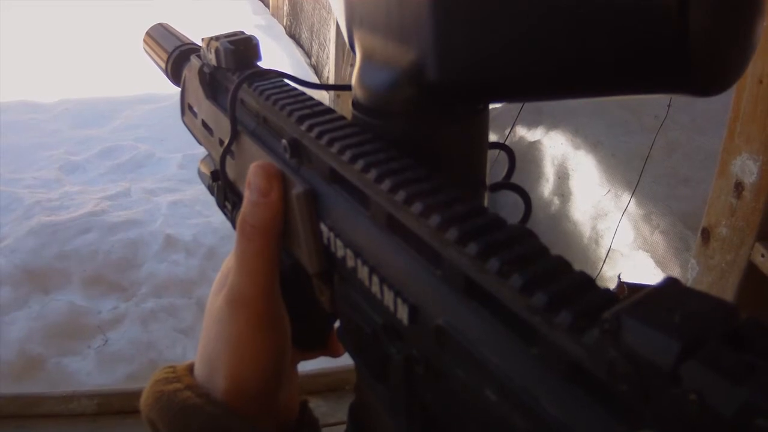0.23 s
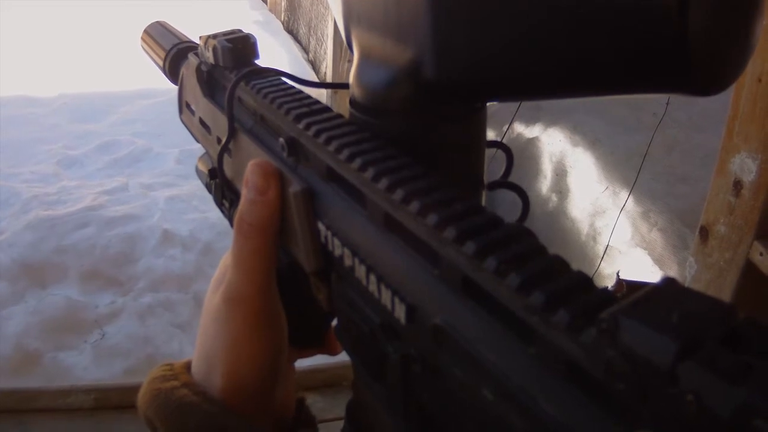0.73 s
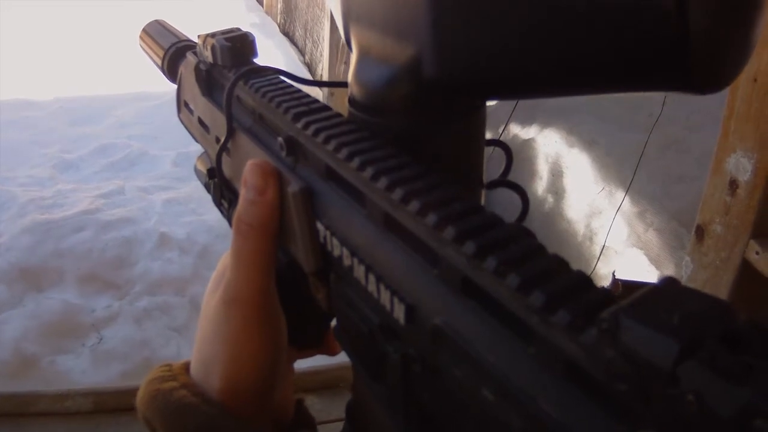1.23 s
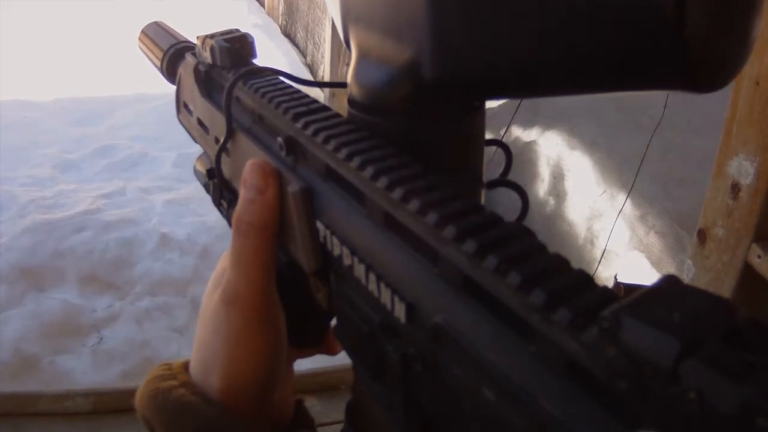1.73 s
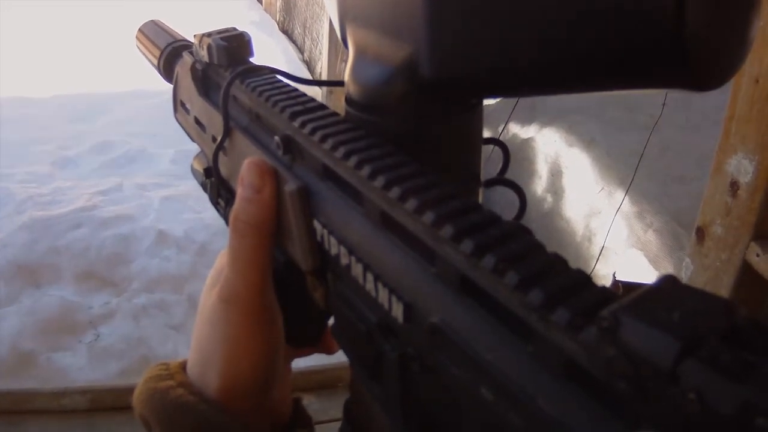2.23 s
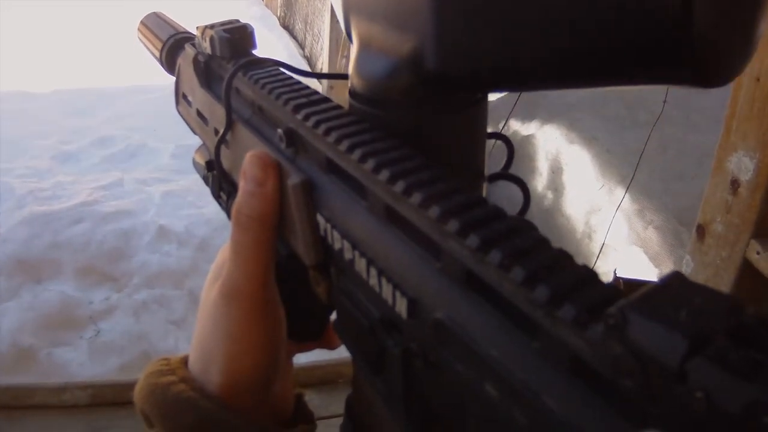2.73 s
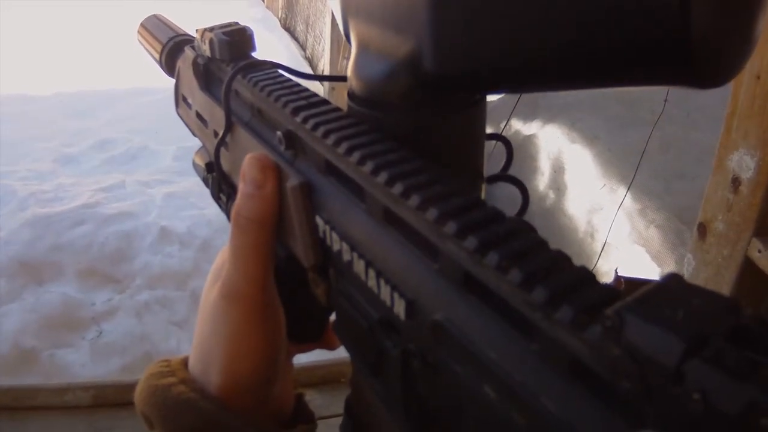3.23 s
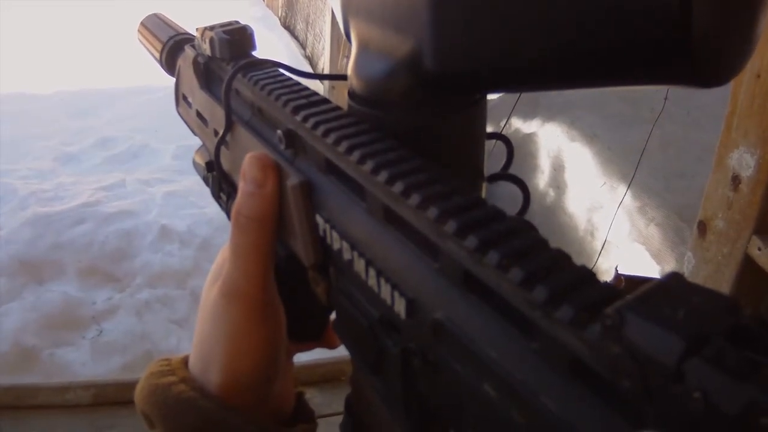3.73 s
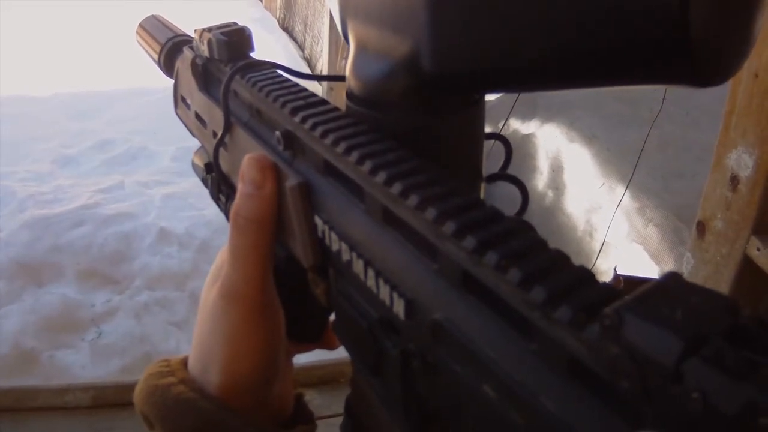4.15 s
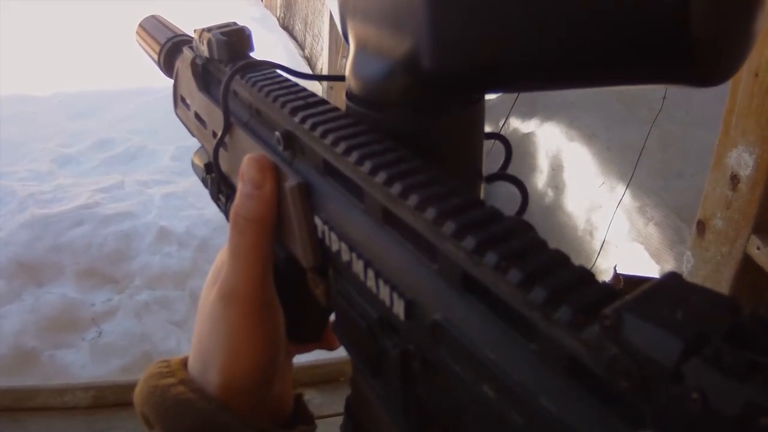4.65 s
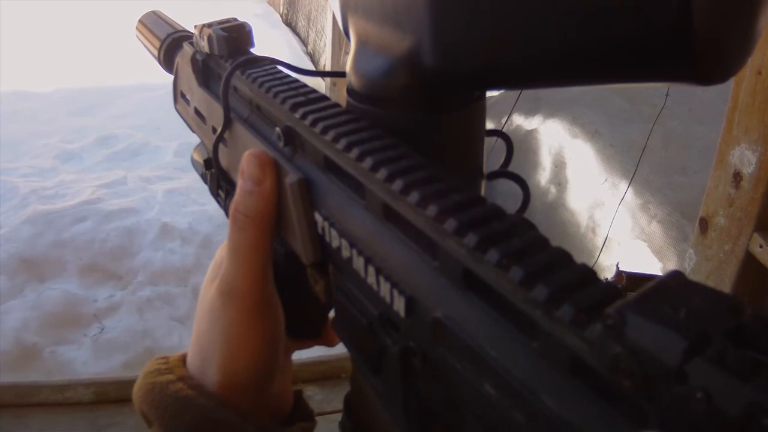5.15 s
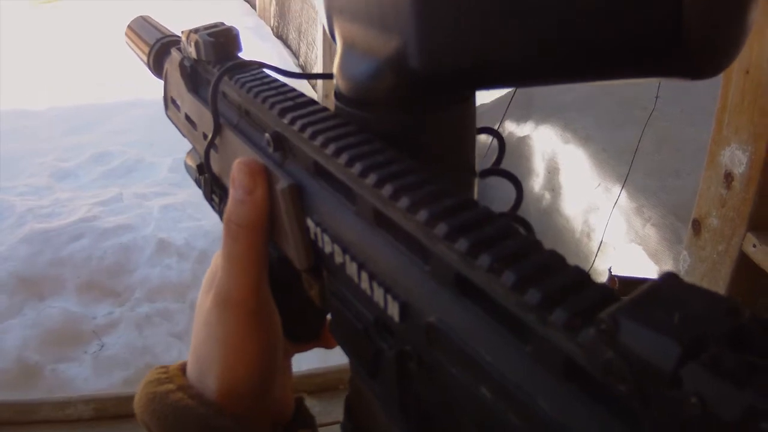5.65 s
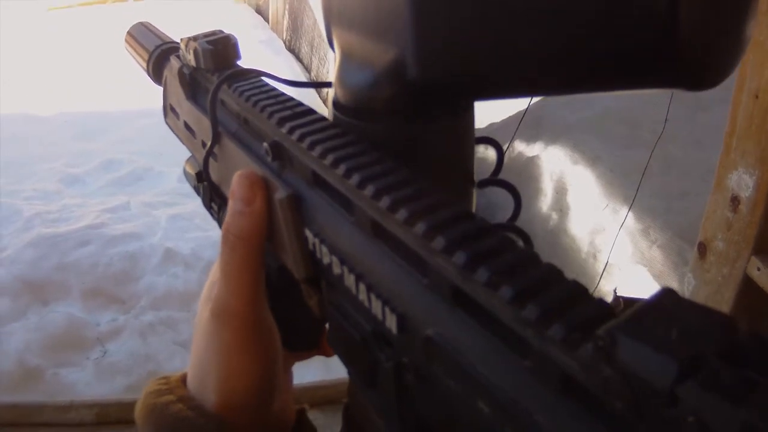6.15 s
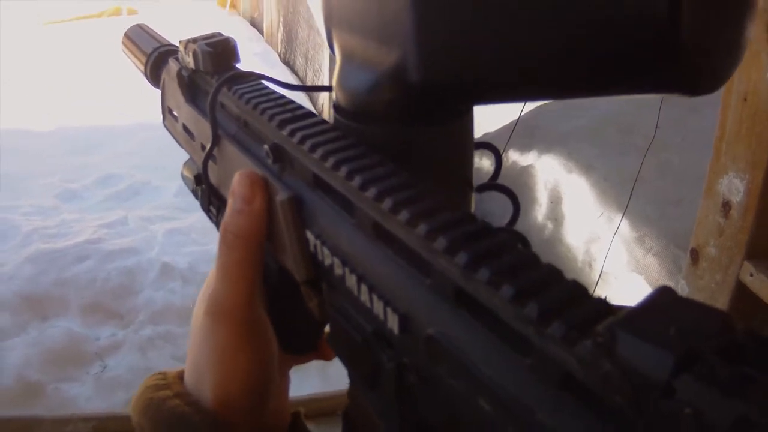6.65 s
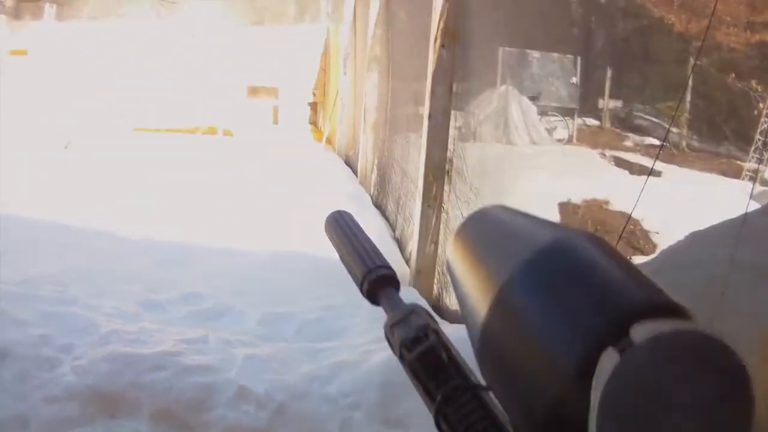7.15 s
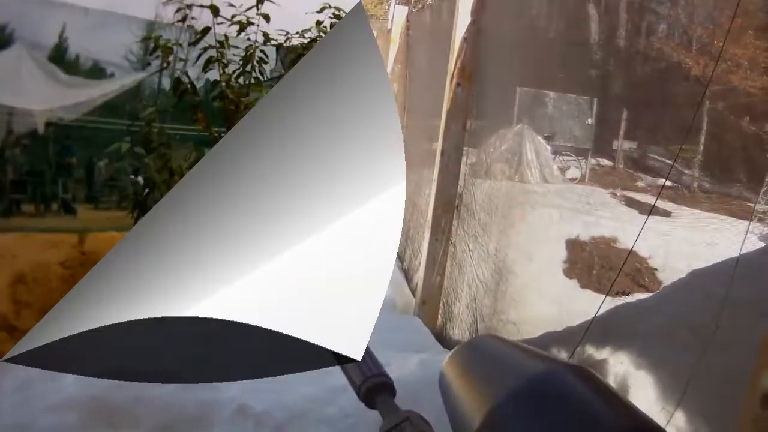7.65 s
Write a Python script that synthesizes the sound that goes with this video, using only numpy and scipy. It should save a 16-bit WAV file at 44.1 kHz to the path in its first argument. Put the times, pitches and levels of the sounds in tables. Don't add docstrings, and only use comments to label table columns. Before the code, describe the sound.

A gas-driven paintball marker fires rapid bursts very close to a boxed-in microphone in a snowy yard beside a wooden wall. Hard, slightly overloaded pops mix with bolt clatter and quick wall echoes. Balls rattle in the hopper and paint splats between bursts. After the last burst the trigger clicks twice, a quiet lull follows, then an abrupt cut brings windy field noise and distant shots.

```python
import sys
import numpy as np
from scipy import signal
from scipy.fft import rfft, irfft
from scipy.io import wavfile
from scipy.ndimage import uniform_filter1d, minimum_filter1d

SR = 44100
rng = np.random.default_rng(int(sys.argv[2]) if len(sys.argv) > 2 else 0)


def convert_level_to_amplitude(level_db):
    exponent = np.asarray(level_db, float) / 20
    return 10 ** exponent


def log_audio(samples):
    frames = np.atleast_2d(samples).T
    limited = np.clip(frames, -1, 1)
    pcm = np.round(limited * 32767).astype(np.int16)
    wavfile.write(sys.argv[1], SR, pcm)


N = 348384
LEAD = SR // 4
CUT_S = 7.36
BOX_HUM_HZ = 507

# first shot t/s, last shot t/s
BURSTS = [
    (-.19, -.049),
    (.957, 1.3795),
    (2.5366, 2.7476),
    (3.1626, 3.3377),
    (4.3713, 4.5119),
    (4.7064, 4.8471),
    (5.0003, 5.141),
]
# blast level/dB, far echo level/dB
STRENGTH = [(0, 4), (0.43, 0), (0.5, 3), (0.16, -2), (0, -2.5), (0.1, 2.5), (0.16, -13.5)]
# f/Hz, level/dB
TICK_COLOUR = [(530, -46), (900, -8), (2440, 2.5), (2830, -6.5), (3830, 1), (4600, -12), (5980, -57),
               (10100, -120)]
# f/Hz, level/dB
SPLASH_COLOUR = [(4000, -33.5), (5000, -10.5), (6500, 0), (8000, -11), (11500, -6), (13000, -20.5)]


def evened(x):
    return x / np.sqrt(np.mean(x ** 2) + 1e-20)


def read(points, hz):
    f, value = np.transpose(points)
    return np.interp(np.log(hz + 1), np.log(f + 1), value)


def add(mix, s, sound):
    part = mix[LEAD + round(s * SR):][:len(sound)]
    part += sound[:len(part)]


def noise(points, size):
    gain = convert_level_to_amplitude(read(points, np.fft.rfftfreq(size, 1 / SR)))
    return evened(irfft(rfft(rng.standard_normal(size)) * gain, size))


def resonate(x, hz, width_hz):
    return signal.lfilter(*signal.iirpeak(hz, hz / width_hz, SR), x)


def ring(modes, t):
    waves = sum(gain * convert_level_to_amplitude(-60 * abs(t) / t60) * np.sin(2 * np.pi * hz * t) for hz, gain, t60 in modes)
    return waves * (t > 0)


def echoed(x, paths):
    taps = np.zeros(1000)
    for ms, gain in paths:
        taps[round(ms * SR / 1000)] = gain
    return np.convolve(x, taps)[:len(x)]


def marker():
    out, body = np.zeros(N + LEAD), blast()
    for s, db, leak_db in shots():
        add(out, s - .001, convert_level_to_amplitude(db) * body)
        add(out, s - .001, convert_level_to_amplitude(db / 2) * crack())
        add(out, s - .012, action(-.4 * db))
        add(out, s - .012, convert_level_to_amplitude(db) * pings())
        add(out, s, recoil(-32, 79))
        leaked = np.sqrt(abs(1 - convert_level_to_amplitude(leak_db) ** 2))
        add(out, s - .002, leaked * leak())
    return out


def shots():
    # t/s, level under the burst/dB
    uneven = [(.992, -6), (1.027, -6), (1.062, -5.5), (1.097, -3.5), (1.134, -5.5), (1.274, -4),
              (2.572, -6.5), (2.606, -4), (2.678, -7), (3.268, -8), (4.407, -2.5), (4.442, -7), (4.512, -4)]
    cycle_s, jitter_s = .0352, .0002
    rows = []
    for (first, last), (db, _) in zip(BURSTS, STRENGTH):
        for s in np.linspace(first, last, round((last - first) / cycle_s) + 1):
            leak_db = sum(less for at, less in uneven if abs(at - s) < cycle_s / 2)
            rows.append((s + jitter_s * rng.standard_normal(), db + leak_db, leak_db))
    return rows


def puff(t, long_s):
    u = np.maximum(t, 0) / long_s
    return (1 - u) * np.exp(-u) * np.clip(t * 15000, 0, 1)


def blast():
    # delay t/ms, signed gain
    blast_paths = [
        (0, 1),
        (1.31, -.9),
        (1.95, .45),
        (5.15, .64),
        (6.02, -.48),
        (13.95, .27),
    ]
    # delay t/ms, gain
    box_paths = [(0, 1), (4.88, 1.05), (13.7, .24), (18.5, .13)]
    # delay t/ms, gain
    port_paths = [(0, 1), (5.12, .6), (8.15, .25), (13.85, .35), (18.75, .22)]
    # f/Hz, signed gain, t60/s
    box_modes = [(606, .72, .0197), (215, .17, .018), (108, .045, .07), (518, -1.2, .0109)]
    t = np.arange(3000) / SR - .001
    gas = 1.8 * (puff(t - .00037, .00012) + puff(t - .00055, .00024))
    body = echoed(gas, blast_paths)
    body += echoed(ring(box_modes, t + .00075), box_paths)
    body += echoed(ring([(1950, .3, .005)], t), port_paths)
    body += ring([(222, .12, .022)], t - .0084)
    return signal.lfilter(*signal.butter(2, 85, "high", fs=SR), body)


def crack():
    t = np.arange(400) / SR - .001
    sharp, soft = rng.uniform(.8, 1.15, 2)
    uncorking = ring([(4300 * sharp, 1.9, .0013)], t - .00004)
    return uncorking - ring([(2900 * soft, .36, .004)], t + .00065)


def action(vent_db):
    # t/ms, level/dB, t60/s
    parts = [
        (-10.5, -28, .025),
        (-6.5, -24, .035),
        (-1.2, -19, .01),
        (.2, -24, .012),
        (1.5, -15.5, .036),
        (4.2, -18, .015),
        (12, -20, .045),
        (24.5, -27, .025),
    ]
    # f/Hz, level/dB
    metal = [(410, -44), (700, -21), (772, -7), (850, -7), (1380, -1), (1720, -2), (4080, 1.5), (4840, -17),
             (6640, -6.5), (7970, -12.5), (10300, -16.5), (11800, -17), (12800, -53), (16600, -80),
             (22000, -120)]
    # f/Hz, width/Hz, level/dB
    frame_modes = [(1400, 120, -4), (2450, 170, 1.5), (3200, 240, -7.5), (3730, 200, -19), (4360, 50, 10),
                   (6200, 370, -8.5), (10500, 1800, -12)]
    t = np.arange(4096) / SR - .012
    loose = rng.standard_normal((len(parts), 2))
    power = 0
    for (ms, db, t60), (late, loud) in zip(parts, loose):
        since = np.maximum(t - (ms + .4 * late) / 1000, 0)
        rise = np.minimum(since / (.001 + .002 * (ms < -5)), 1)
        vented = vent_db * (1.8 * (0 < ms < 1) + .6 * (1 < ms < 3) - .4 * (ms > 10))
        level_db = db + 1.2 * loud + vented - 60 * since / t60
        power += convert_level_to_amplitude(2 * level_db) * rise ** 2
    unevenness = evened(uniform_filter1d(rng.standard_normal(len(t)), size=50))
    grit = noise(metal, len(t)) * convert_level_to_amplitude(2.6 * unevenness)
    frame = 0
    for (hz, width, db), more in zip(frame_modes, rng.normal(0, 3.5, len(frame_modes))):
        frame = frame + convert_level_to_amplitude(db + more) * resonate(grit, hz, width)
    return convert_level_to_amplitude(5.5) * np.sqrt(power) * evened(grit + .61 * frame)


def pings():
    # t/ms, f/Hz, level/dB, t60/s
    steel = [
        (-9.5, 6600, -20.5, .008),
        (-9, 9000, -25.5, 0.0049),
        (-6, 9600, -23.5, 0.0042),
        (-0.45, 21000, -10, 0.012),
        (3.7, 6000, -11.5, 0.0051),
        (4.5, 10300, -14, .007),
    ]
    t = np.arange(1200) / SR - .012
    loose = rng.standard_normal((len(steel), 3))
    push = np.sin(2 * np.pi * 600 * (t + .0044)) * np.clip((t + .008) / .003, 0, 1) * (t < 0)
    out = convert_level_to_amplitude(-27) * push
    for (ms, hz, db, t60), (late, pitch, loud) in zip(steel, loose):
        since = t - (ms + .12 * late) / 1000
        mode = (hz * (1 + .04 * pitch), convert_level_to_amplitude(db + 2 * loud), t60)
        out += ring([mode], since) * np.clip(since / .00038, 0, 1)
    return out


def recoil(db, hz):
    t = np.arange(4096) / SR
    shudder = resonate(resonate(rng.standard_normal(len(t)), hz, 150), hz, 130)
    return convert_level_to_amplitude(db - 60 * t / .04) * np.minimum(t / .0016, 1) * evened(shudder)


def leak():
    t, push = np.arange(2048) / SR, rng.standard_normal(2048)
    flutter = evened(sum(resonate(resonate(push, hz, 120), hz, 120) for hz in (250, 425, 600)))
    return convert_level_to_amplitude(-14 - 60 * t / .04) * np.minimum(t / .003, 1) * flutter


def trigger():
    # t/s, level/dB, rise/s
    clicks = [
        (5.6944, 0, .0004),
        (5.7539, -2, .0009),
    ]
    # f/Hz, level/dB, t60/s
    sear = [
        [(1350, -25.5, 0.013), (2350, -11.5, 0.011), (3060, -13, 0.0049), (3550, -5.5, 0.0064),
         (3800, -8, .007), (6160, -8, 0.00602), (7000, -19.5, 0.011), (7750, -18, 0.0074), (8140, -13, 0.00697),
         (9350, -14.5, .007), (10300, -16, .005), (11600, -23, .005)],
        [(1210, -26.5, 0.013), (1940, -18.5, .009), (2900, -16.5, 0.0098), (3700, -20, 0.0065),
         (3840, -2, .008), (5970, -4.5, .007), (6250, -13, .006), (7300, -13, .007), (7930, -11.5, 0.0065),
         (8800, -23, 0.0072), (10100, -12.5, .006), (11320, -15, .004)],
    ]
    out, t = np.zeros(N + LEAD), np.arange(8192) / SR
    for (s, db, rise_s), modes in zip(clicks, sear):
        snap = ring([(hz, convert_level_to_amplitude(mode_db), 1.6 * t60) for hz, mode_db, t60 in modes], t)
        snap *= convert_level_to_amplitude(-20 * (t / .0042) ** 2)
        buzz = convert_level_to_amplitude(-40.5 - 60 * t / .12) * noise(SPLASH_COLOUR, len(t))
        buzz += convert_level_to_amplitude(-47.5 - 60 * t / .25) * noise(TICK_COLOUR, len(t))
        add(out, s, convert_level_to_amplitude(db) * (snap * np.minimum(t / rise_s, 1) + buzz))
    return out


def small_hits():
    # t/s, peak level/dB, ring f/Hz, splash over the tick/dB
    splats = [(.03, -22, 3640, -6), (.0818, -21, 2424, -12), (0.7247, -60, 1398, 6),
              (1.5079, -23.5, 2200, -10), (1.9964, -43, 1940, -17), (2.0259, -37.5, 999, -15),
              (2.063, -34.5, 1128, -16.5), (2.0848, -43, 1174, -10.5), (2.8322, -17, 1581, -12),
              (2.9131, -20, 2580, -6), (2.932, -26, 1425, -17), (3.115, -44.5, 1045, -10),
              (3.5043, -27.5, 2470, 0), (3.794, -38.5, 3200, -21), (4.2585, -40, 1360, -17),
              (4.6425, -24, 2800, -4), (4.6645, -22.5, 2300, -11.5), (5.675, -47, 3026, -15),
              (5.9744, -56, 2280, -11.5), (6.1494, -53, 1810, -13.5), (6.1819, -48.5, 2320, -8.5)]
    # t/s, peak level/dB, ring f/Hz
    knocks = [(0.174, -34.5, 2330), (0.4705, -34.5, 994), (.68, -41.5, 3240), (1.597, -24.5, 2400),
              (1.7398, -56.5, 1885), (1.756, -30, 2040), (1.9241, -40.5, 1048), (2.163, -36, 1404),
              (2.9718, -34, 1110), (3.5935, -44, 1340), (3.609, -35.5, 3380), (3.6432, -56, 1040),
              (3.7306, -44, 1005), (3.8095, -44, 1031), (3.8374, -51.5, 1278), (3.914, -48, 1313),
              (4.2851, -34.5, 1252), (4.5933, -34, 1361), (5.226, -33.5, 1810), (5.436, -42.5, 1293),
              (5.513, -43, 2333), (5.6142, -48.5, 1300), (7.005, -39, 3870), (7.0225, -39.5, 2434),
              (7.0396, -45.5, 2235)]
    # t/s, peak level/dB, ring f/Hz
    hopper = [(0.1399, -29.5, 1070), (.189, -29, 1060), (0.2405, -30.5, 1054), (0.324, -36.5, 1300),
              (0.386, -29, 1290), (.413, -40, 1007), (0.5417, -36.5, 1016), (.598, -32.5, 1033),
              (0.6306, -31.5, 1270), (.852, -40, 1465), (1.619, -53.5, 1480), (1.8833, -45, 1320),
              (1.9134, -40, 1420), (2.891, -27.5, 1043), (3.0103, -42, 1990), (3.0554, -38.5, 1310),
              (3.484, -24.5, 2380), (3.886, -44.5, 1041), (4.1145, -48.5, 1346), (1.816, -54, 1470),
              (4.2702, -36, 1310), (4.929, -26, 1746), (5.281, -31, 1020), (5.2937, -28.5, 1412),
              (5.345, -33, 1352), (5.3573, -37.5, 1300), (5.3895, -33.5, 4150), (5.469, -45, 2450),
              (5.5402, -33, 4140), (5.5567, -45, 1960), (3.14, -50, 3300), (7.0192, -45.5, 3310),
              (7.056, -47.5, 2400), (7.085, -52, 2293), (7.107, -55.5, 2296)]
    # t/s, peak level/dB, ring f/Hz
    crackles = [(0.0591, -21.5, 1060), (0.212, -37, 1380), (0.2242, -36, 1280), (0.2763, -40, 1240),
                (0.3367, -34.5, 3850), (0.3444, -43, 1280), (0.3994, -46, 1020), (0.4294, -53, 1000),
                (0.4528, -35.5, 1030), (0.4894, -44, 1020), (0.556, -37, 2320), (0.5685, -41, 2710),
                (0.6404, -46, 1255), (0.6648, -35, 1450), (0.6944, -42, 1460), (0.7894, -49, 1070),
                (0.895, -46.5, 2330), (1.4506, -18, 1280), (1.4652, -25, 1030), (1.6444, -43, 1040),
                (1.6664, -39, 1030), (1.6844, -45, 1350), (1.7044, -51, 1400), (1.72, -47, 1650),
                (1.8444, -57, 1880), (1.9384, -55, 1024), (1.9674, -43, 1450), (2.046, -45, 1290),
                (2.071, -45, 1520), (2.0934, -42, 1040), (2.1849, -57.5, 1346), (2.199, -56, 1780),
                (2.232, -60, 1215), (2.8745, -21.5, 1210), (2.984, -43, 1680), (3.0435, -39.5, 2020),
                (3.067, -42, 1090), (3.0794, -54, 1080), (3.0929, -37, 1370), (3.421, -24, 1570),
                (3.5204, -24.5, 2460), (3.5396, -35.5, 1020), (3.6844, -47, 1376), (3.7285, -51, 1010),
                (3.8499, -51, 1064), (3.9, -53, 1040), (3.9444, -54, 1380), (4.0986, -55.5, 2530),
                (4.1346, -50.5, 1270), (4.155, -52, 1280), (4.1772, -45.5, 1020), (5.3044, -43, 1390),
                (5.314, -39, 4060), (5.3792, -42, 1070), (5.4014, -45, 1260), (5.4254, -39, 1010),
                (5.5694, -54.5, 1250), (5.593, -49, 1290)]
    # t/s, peak level/dB, ring f/Hz, splash over the tick/dB
    far_play = [(7.3646, -23.5, 1510, -17), (7.3754, -14.5, 3360, -11), (7.3922, -22.5, 3050, -9),
                (7.409, -25.5, 2450, -8), (7.426, -27, 2900, -17), (7.4901, -26.5, 3500, -15),
                (7.4995, -34, 3600, -14), (7.655, -22, 1400, -13), (7.79, -29, 3700, -12),
                (7.4789, -29, 1070, 2.5), (7.5187, -13.5, 3000, -12.5), (7.5497, -24, 2350, -10),
                (7.565, -21.5, 3140, -13), (7.5823, -27.5, 3250, -17), (7.5991, -17, 2510, -17),
                (7.6471, -22.5, 1400, -7), (7.6904, -14.5, 3550, -14), (7.7236, -25, 2500, -17),
                (7.7475, -23.5, 2270, -2), (7.7651, -14, 3560, -16), (7.821, -28, 1970, -21),
                (7.836, -24, 3950, -8), (7.859, -16.5, 1940, -17), (7.8964, -23, 2090, -21)]
    # thud dB, splash dB over the tick
    close = [(s, db, hz, 0, splash_db) for s, db, hz, splash_db in splats]
    close += [(*row, 3, -29.5) for row in knocks]
    close += [(*row, -2.5, -22.5) for row in hopper]
    far = [(s, db, hz, -16.5, splash_db) for s, db, hz, splash_db in far_play]
    crackle = convert_level_to_amplitude(3.5) * rattles([(*row, -9.5, -20) for row in crackles], .02, after_db=-26)
    distant = rattles(far, .022, after_db=-20)
    dulled = signal.lfilter(*signal.butter(2, 7500, fs=SR), distant)
    return rattles(close, .027, after_db=-21.5) + crackle + dulled


def rattles(rows, t60, after_db):
    # f/Hz, level/dB
    dull = [(600, -20), (1000, -0.5), (4300, 0.5), (5000, -15), (6600, -7.5), (7600, -23), (12000, -40)]
    # f/Hz, width/Hz
    stirred = [(1250, 100), (2350, 350), (3200, 350), (4050, 130), (6600, 600)]
    out, t = np.zeros(N + LEAD), np.arange(4096) / SR
    fade = convert_level_to_amplitude(-60 * t / t60) * np.minimum(t / .00047, 1)
    after = convert_level_to_amplitude(after_db - 60 * t / .3)
    for s, db, hz, thud_db, splash_db in rows:
        buzz, white = noise(TICK_COLOUR, len(t)), noise(dull, len(t))
        bands = sum(convert_level_to_amplitude(rng.normal(0, 4)) * resonate(white, f, width) for f, width in stirred)
        tick = evened(.4 * buzz + .6 * evened(bands) + .8 * evened(resonate(white, hz, 350)))
        thud = evened(resonate(rng.standard_normal(len(t)), BOX_HUM_HZ, 170))
        splash = noise(SPLASH_COLOUR, len(t))
        body = convert_level_to_amplitude(splash_db) * splash + convert_level_to_amplitude(thud_db + 1.5) * thud
        add(out, s, convert_level_to_amplitude(db - 9) * (fade * tick + after * buzz + (fade + .81 * after) * body))
    return out


def bumps():
    # t/s, level/dB, f/Hz
    thumps = [(.57, -39.5, 110), (1.671, -51, 90), (2.232, -54.5, 254.6), (2.385, -41, 200),
              (3.631, -53, 118.5), (3.769, -50.5, 180), (5.359, -46, 110), (5.559, -49.5, 128.5),
              (5.734, -48, 330), (6.978, -56.5, 300), (7.001, -59, 200), (7.392, -42.5, 151),
              (7.45, -32, 131), (7.473, -34, 220), (7.49, -32, 110), (7.695, -33, 151), (7.86, -35, 130)]
    out, t = np.zeros(N + LEAD), np.arange(4096) / SR
    for s, db, hz in thumps:
        swing = ring([(hz, convert_level_to_amplitude(db + 2.5), .05)], t) * np.minimum(t / .0025, 1)
        add(out, s, .45 * recoil(db, hz) + swing)
    return out


def yard(x):
    # f/Hz, t60/s
    yard_t60 = [(100, 0.49), (300, 0.35), (600, 0.48), (1200, 0.51), (2500, 0.3), (4500, 0.3), (8000, 0.25),
                (13000, 0.11)]
    clumps = convert_level_to_amplitude(7.4 * evened(uniform_filter1d(rng.standard_normal(SR), size=200)))
    hz, t, z = signal.stft(clumps * rng.standard_normal(SR), SR, nperseg=256)
    tail = signal.istft(z * convert_level_to_amplitude(-60 * t / read(yard_t60, hz)[:, None]), SR, nperseg=256)[1]
    tail *= np.clip(np.arange(len(tail)) / SR / .0069 - 1, 0, 1)
    return signal.fftconvolve(x, tail / np.linalg.norm(tail))[:len(x)]


def air():
    # f/Hz, level/dB
    wind_colour = [(12, -47.5), (20, -19.5), (76, -2), (145, -3), (198, -4), (245, -4), (400, -9.5),
                   (520, -36), (880, -120)]
    # f/Hz, level/dB
    field_colour = [(150, -46.5), (250, -11), (445, 0.5), (981, -7.5), (3600, -15), (4460, -27.5),
                    (6520, -25), (8210, -47), (11200, -33), (12800, -68.5), (16600, -91), (22000, -120)]
    # f/Hz, level/dB
    fizz_colour = [(3500, -31), (4800, -3), (6500, -0.5), (8000, -5), (11500, -10.5), (13000, -25.5)]
    wind_db, hum_db, air_db = background_db()
    lumps = [evened(uniform_filter1d(rng.standard_normal(N), size=size)) for size in (1200, 700, 300)]
    wind = convert_level_to_amplitude(wind_db + 3.5 * lumps[0] - 1.5) * noise(wind_colour, N)
    hum = evened(resonate(resonate(rng.standard_normal(N), BOX_HUM_HZ, 350), BOX_HUM_HZ, 130))
    drops = convert_level_to_amplitude(1.6 * np.minimum(rng.exponential(1, N), 4)) * (rng.random(N) < 70 / SR)
    drop_fade = convert_level_to_amplitude(-60 * np.arange(1500) / SR / .063)
    patter = .86 + evened(signal.oaconvolve(drops, drop_fade)[:N])
    fizz_db = np.where(np.arange(N) < CUT_S * SR, -13.5, -11)
    wash = patter * noise(field_colour, N) + convert_level_to_amplitude(fizz_db) * noise(fizz_colour, N)
    return wind + convert_level_to_amplitude(hum_db + 1.6 * lumps[1]) * hum + convert_level_to_amplitude(air_db - 7 + 1.3 * lumps[2]) * wash


def background_db():
    # t/s, level/dB
    breeze = [(0, -61.5), (.6, -54), (.9, -58.5), (1.7, -61.5), (1.86, -49.5), (2.1, -56), (2.5, -52.5),
              (2.9, -50.5), (3.5, -60.5), (3.77, -55), (3.86, -72), (4.3, -80.5), (5.36, -57), (5.6, -70.5),
              (5.87, -75), (6.2, -79.5), (6.4, -66.5), (7.3, -75.5)]
    # t after the change/s, level/dB
    gust = [(0, -43.5), (.06, -48.5), (.126, -37), (.18, -44), (.24, -48), (.35, -49.5), (.54, -46.5)]
    trees_s, trees_fade_s, trees_drop_db = .86, .04, 12
    t = np.arange(N) / SR
    rustle = convert_level_to_amplitude(-65) ** 2 * np.exp(-((t - 6.5) / .12) ** 2)
    hum = convert_level_to_amplitude(-72.5) ** 2 + rustle
    wash = convert_level_to_amplitude(-74) ** 2 + hum / 4
    for (first, last), (_, echo_db) in zip(BURSTS, STRENGTH):
        since = np.maximum(t - last, 0)
        left_db = echo_db - trees_drop_db * np.clip((since - trees_s) / trees_fade_s, 0, 1)
        hum = hum + (t > first) * convert_level_to_amplitude(-46 + left_db - 18 * since) ** 2
        wash = wash + (t > first) * convert_level_to_amplitude(-45 + left_db - 32.5 * since) ** 2
    field = t - CUT_S
    in_yard = field < 0
    wind_db = np.where(in_yard, np.interp(t, *np.transpose(breeze)), np.interp(field, *np.transpose(gust)))
    hum_db = np.where(in_yard, 10 * np.log10(hum), -45)
    field_air_db = -41 - 18 * np.clip(1 - field / .09, 0, 1)
    air_db = np.where(in_yard, 10 * np.log10(wash), field_air_db)
    return wind_db, hum_db, air_db


def scene():
    near, small = marker(), small_hits()
    outside = near - .49 * resonate(near, 490, 110)
    scatter = yard(convert_level_to_amplitude(-15.5) * outside + convert_level_to_amplitude(-13) * small)
    heard = near + small + trigger() + bumps() + scatter
    return (heard[LEAD:] + air())[None]


def patchy_treble(x):
    # f/Hz, threshold/spreads
    rarity = [(3000, 3), (5000, 2.1), (8000, 1.6), (11000, 1.05), (13000, .9)]
    hz, _, z = signal.stft(x, SR, nperseg=512, noverlap=384)
    top_db = 10 * np.log10((abs(z[hz > 2500]) ** 2).sum(axis=0) + 1e-14)
    coming_db = -minimum_filter1d(-top_db, size=9, origin=-4) - top_db
    risen_db = top_db - minimum_filter1d(top_db, size=7, origin=3)
    patches = uniform_filter1d(rng.standard_normal(z.T.shape), size=9, axis=0)
    patches = evened(uniform_filter1d(patches, size=5, axis=1)).T
    spared = .4 * np.maximum(risen_db - 4, 0) - .06 * np.minimum(coming_db, 16)
    kept = np.clip(4 * (read(rarity, hz)[:, None] + spared - patches), .02, 1)
    return signal.istft(z * kept, SR, nperseg=512, noverlap=384)[1][:N]


def top_cut(x):
    return signal.sosfilt(signal.butter(12, 12950, fs=SR, output="sos"), x)


def record(dry):
    # f/Hz, level/dB
    hiss_colour = [(18, -44.5), (30, -11.5), (333, -14.5), (475, -9.5), (731, -19.5), (941, -23),
                   (1020, -21.5), (2400, -19.5), (6140, -26.5), (11300, -24.5), (12800, -43.5),
                   (16600, -76.5), (22000, -120)]
    whine = evened(resonate(rng.standard_normal(N), 6700, 200))
    whine *= convert_level_to_amplitude(5.8 * evened(uniform_filter1d(rng.standard_normal(N), size=450)))
    x = dry + convert_level_to_amplitude(-71.5) * noise(hiss_colour, N) + convert_level_to_amplitude(-86) * whine
    x = np.clip(x, -.94, .94)
    low_pass = signal.butter(22, 12000, fs=SR, output="sos")
    x = signal.sosfilt(low_pass, patchy_treble(x[0])[None])
    return top_cut(x)


dry = scene()
out = record(dry)
log_audio(out)
```